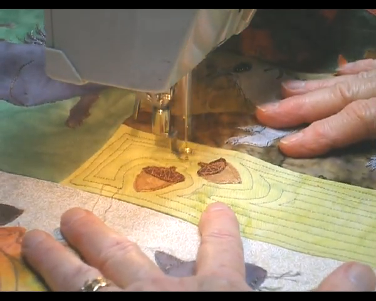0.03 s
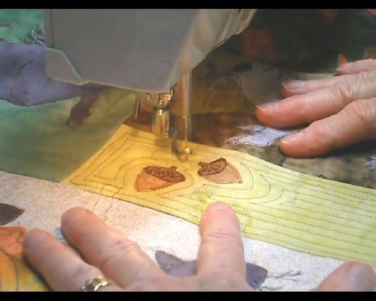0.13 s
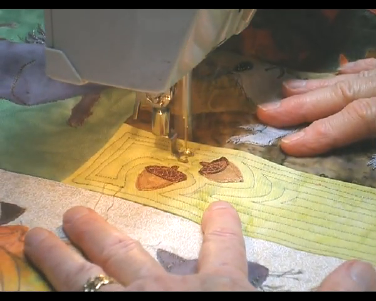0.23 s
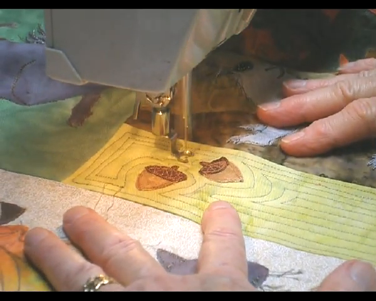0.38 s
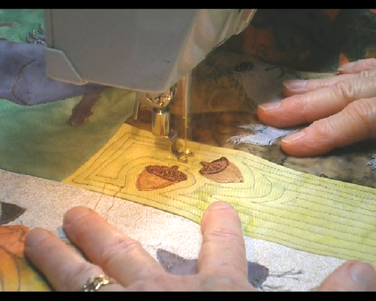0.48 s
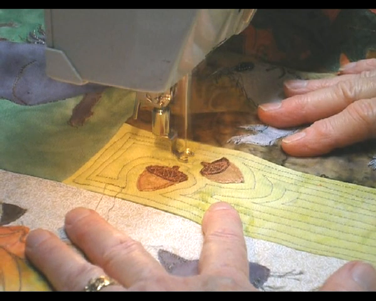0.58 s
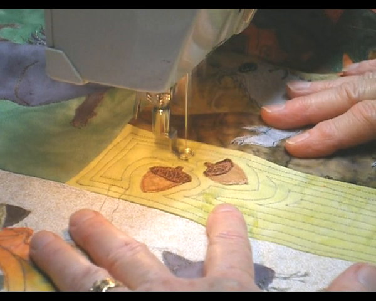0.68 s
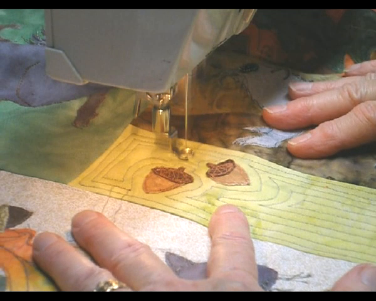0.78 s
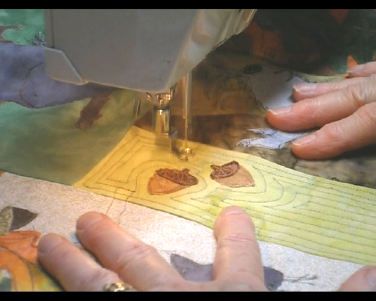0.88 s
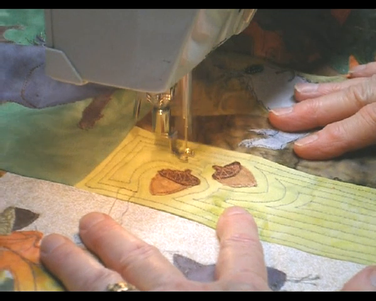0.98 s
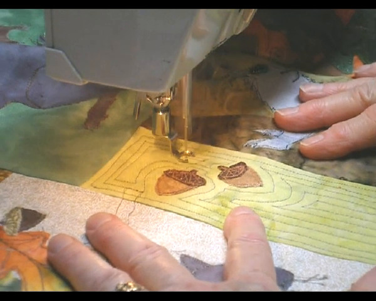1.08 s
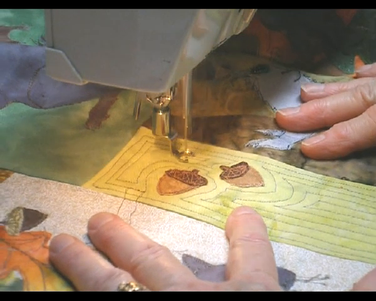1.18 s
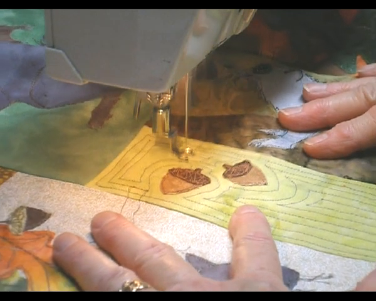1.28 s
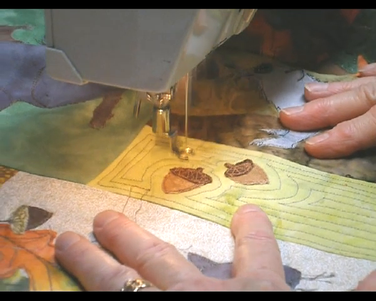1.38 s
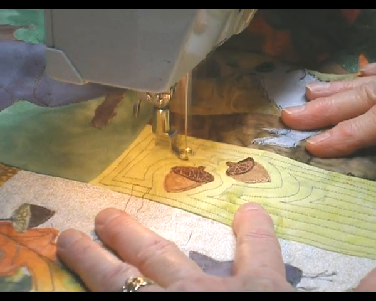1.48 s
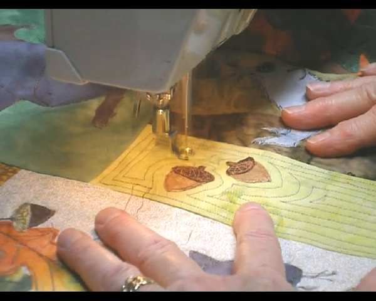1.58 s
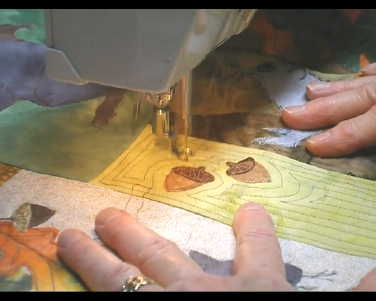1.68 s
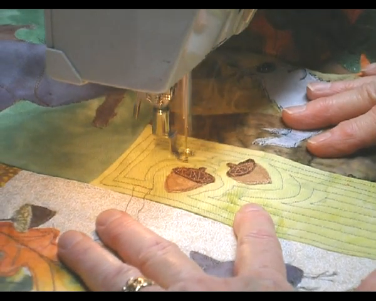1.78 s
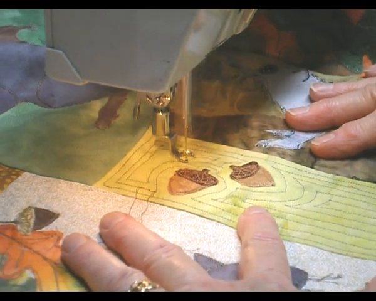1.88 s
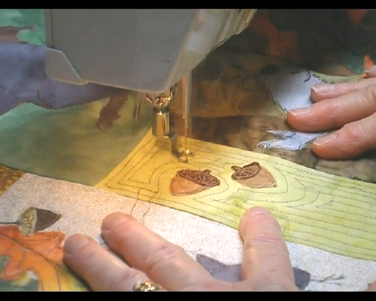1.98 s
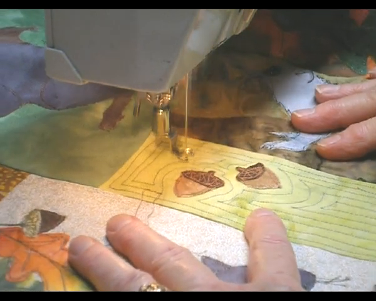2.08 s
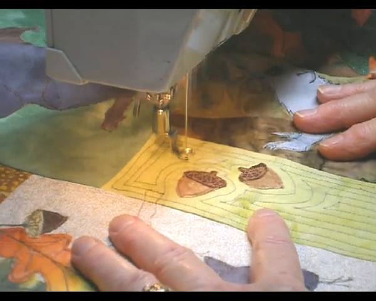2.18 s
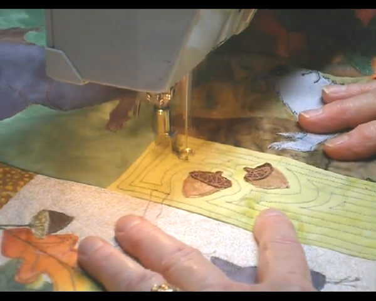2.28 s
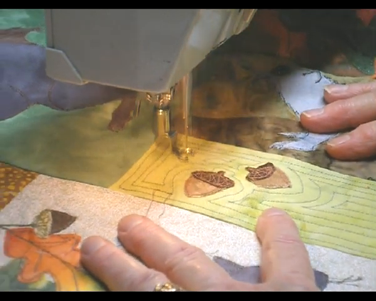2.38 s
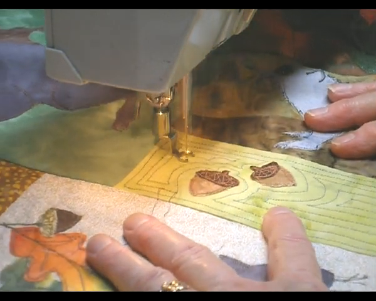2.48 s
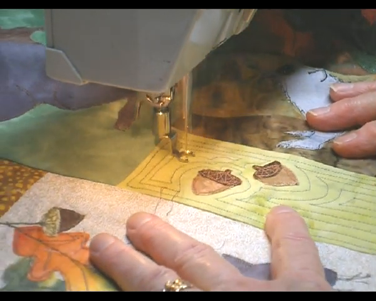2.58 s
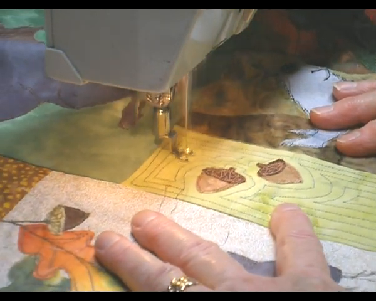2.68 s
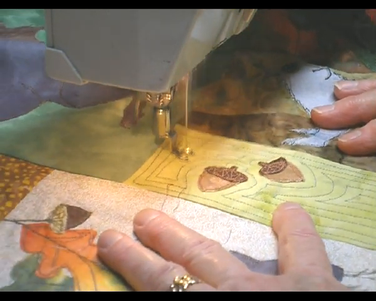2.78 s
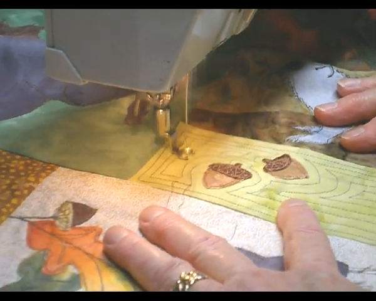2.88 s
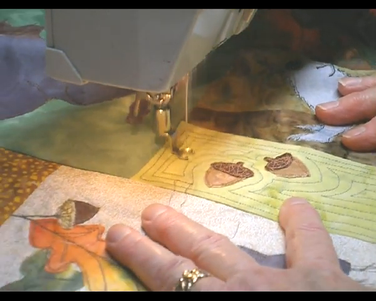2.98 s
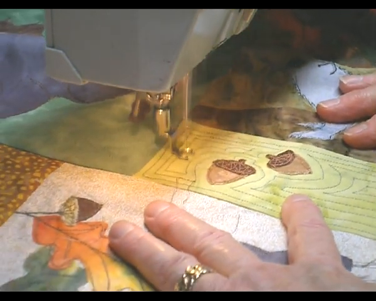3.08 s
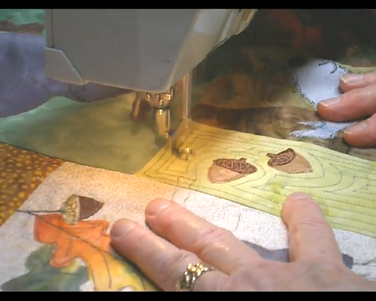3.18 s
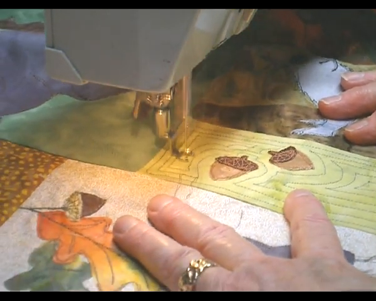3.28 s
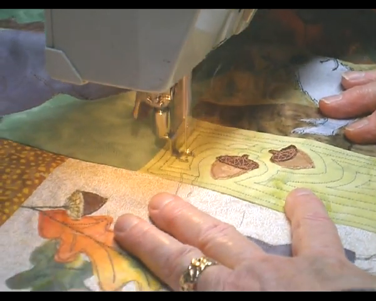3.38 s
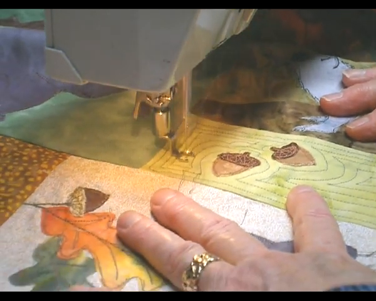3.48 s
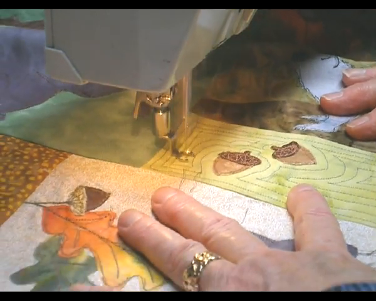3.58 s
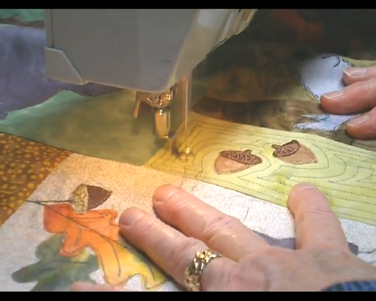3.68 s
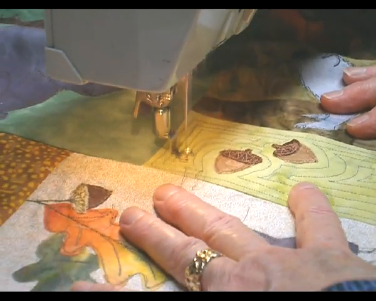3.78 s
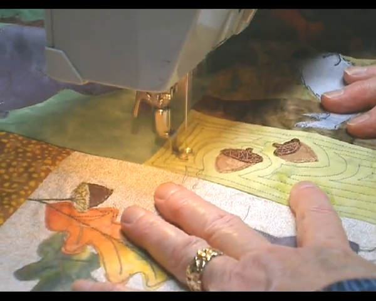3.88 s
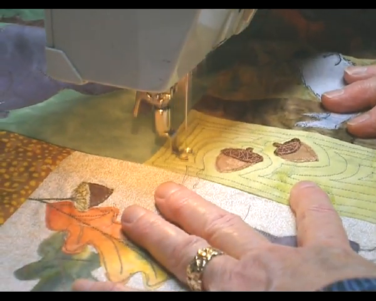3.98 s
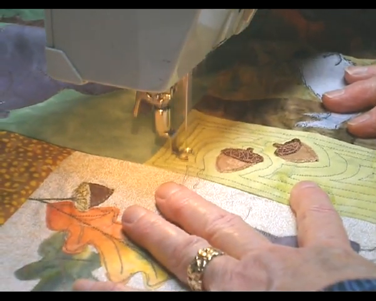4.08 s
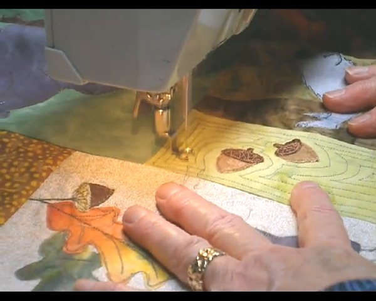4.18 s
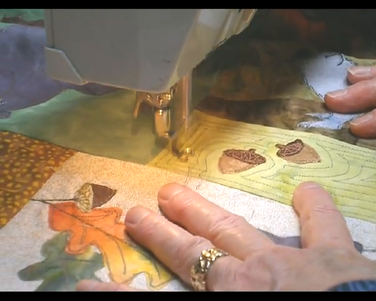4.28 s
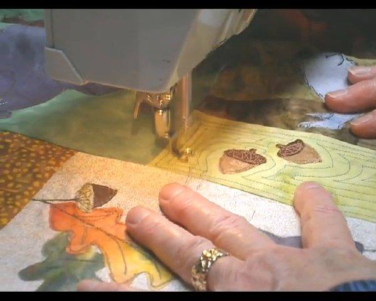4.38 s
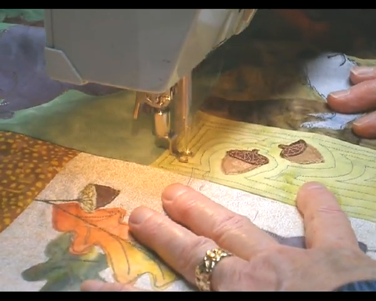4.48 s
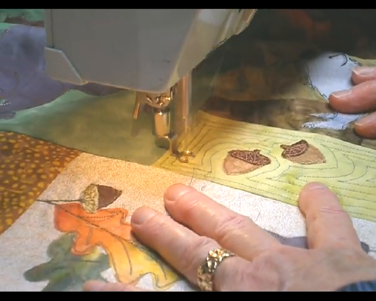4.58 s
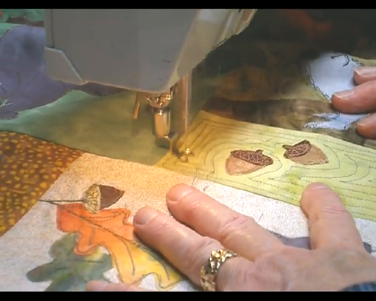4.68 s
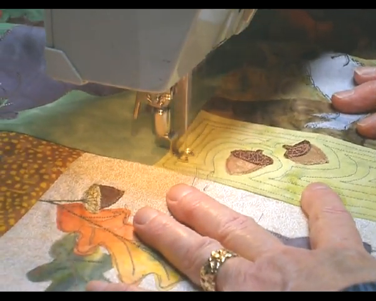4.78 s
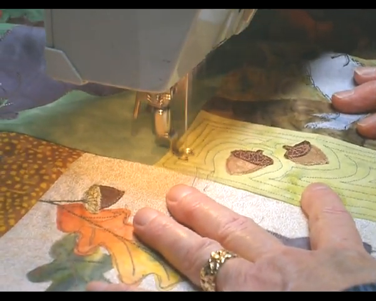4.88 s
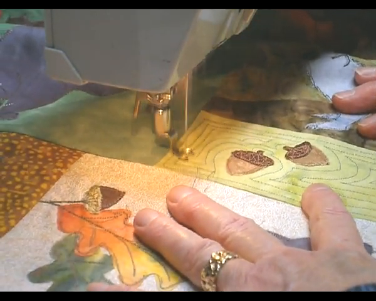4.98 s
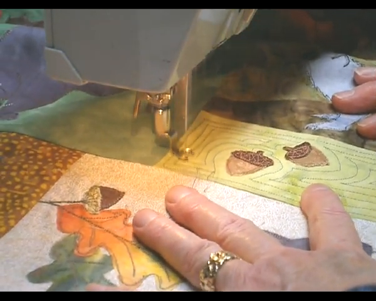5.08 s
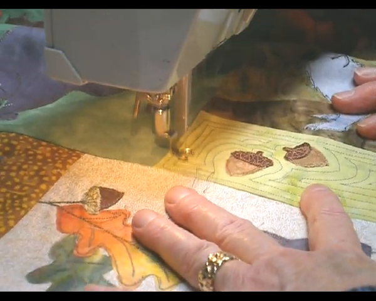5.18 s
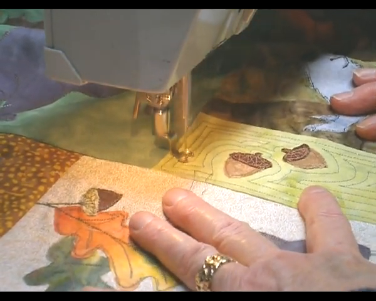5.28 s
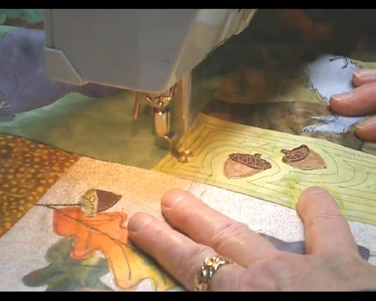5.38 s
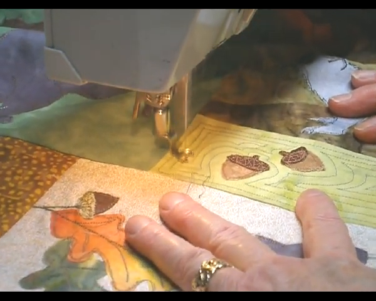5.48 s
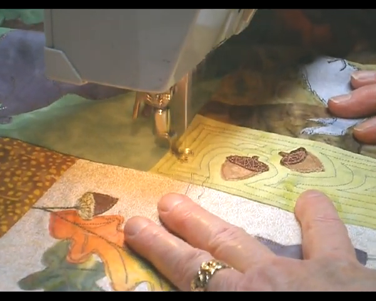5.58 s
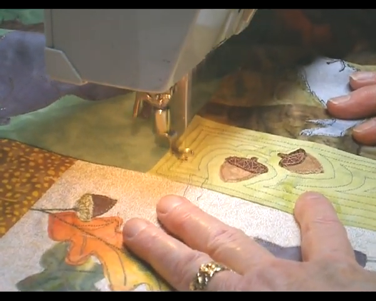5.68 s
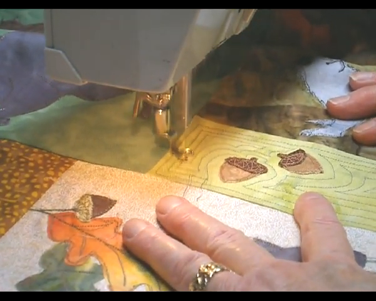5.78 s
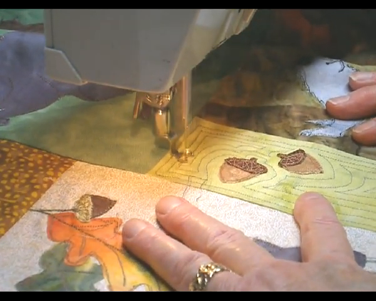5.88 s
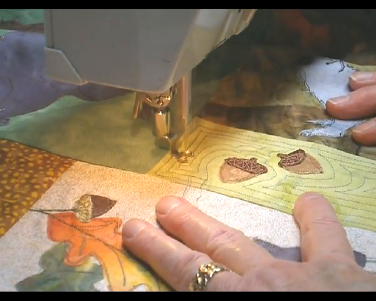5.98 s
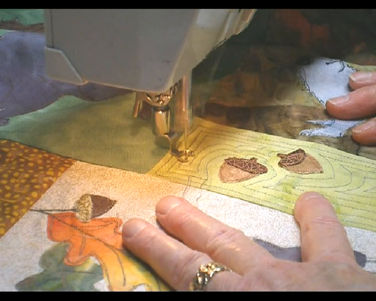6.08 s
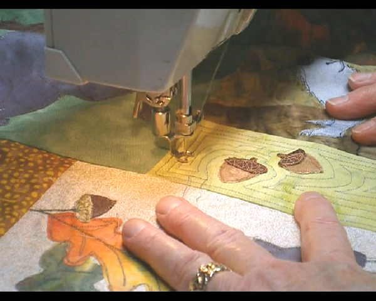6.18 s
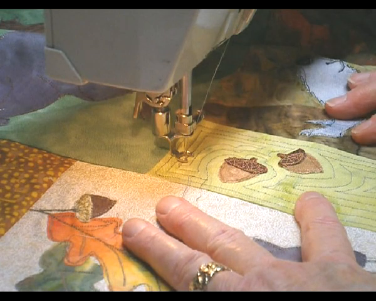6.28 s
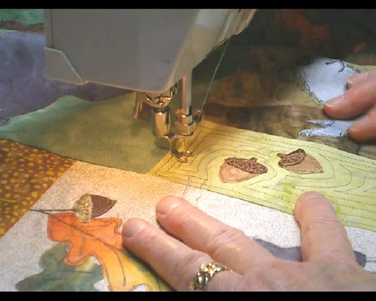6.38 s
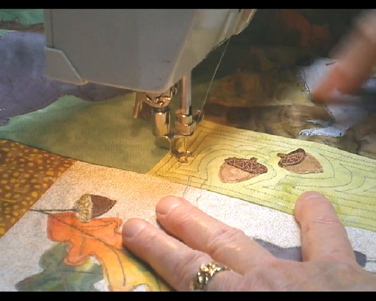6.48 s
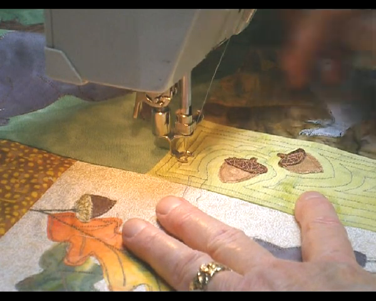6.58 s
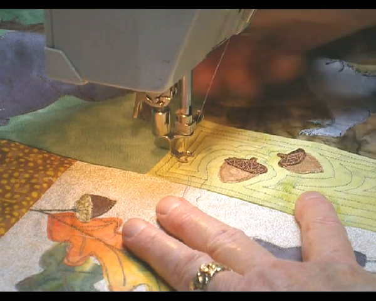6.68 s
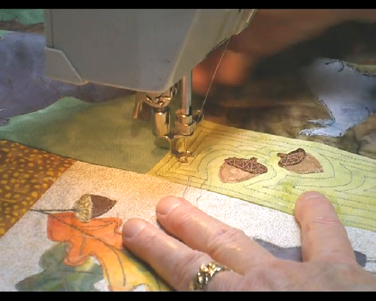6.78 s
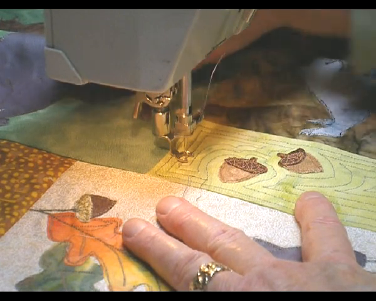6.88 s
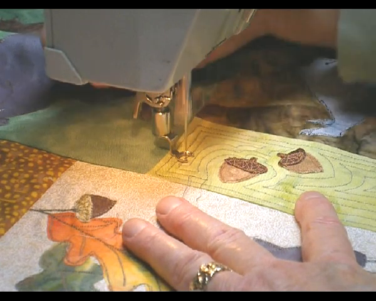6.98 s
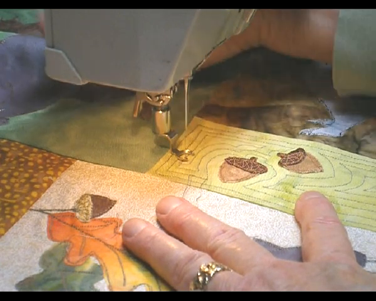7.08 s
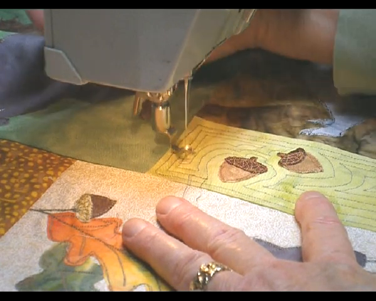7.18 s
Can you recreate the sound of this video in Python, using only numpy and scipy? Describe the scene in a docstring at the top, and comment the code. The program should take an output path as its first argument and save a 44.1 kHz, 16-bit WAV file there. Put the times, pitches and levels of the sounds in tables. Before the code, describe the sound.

A home sewing machine stitches steadily with a rapid clatter and whir, stops suddenly, then a lever knocks and clicks.

```python
"""In a small room, a home sewing machine stitches a quilt at about sixteen stitches a second, coasts to
a stop, and a hand then works a lever on its arm. The excitation is periodic: every turn of the shaft
repeats the same impacts, which ring the modes of bed, arm and steel parts over a whir of gears.
A small microphone samples the sound at a low rate; joining the samples by straight lines mirrors
its spectrum into the treble."""
import sys
import numpy as np
from scipy import signal
from scipy.fft import rfft, irfft, next_fast_len
from scipy.io import wavfile

SR = 44100
rng = np.random.default_rng(int(sys.argv[2]) if len(sys.argv) > 2 else 0)


def unload_audio(sound):
    """Save the sound as a 16-bit wav file, at the path given as the first command line argument."""
    columns = np.transpose(np.atleast_2d(sound))
    # keep every value between -1 and 1, then stretch to whole-number steps
    steps = np.round(np.clip(columns, -1, 1) * 32767)
    wavfile.write(sys.argv[1], SR, steps.astype(np.int16))


N = 319725

# Noise spectra of the room and of the gears and thread: frequency_hz, density_db
ROOM_SPECTRUM = [(24, -44), (40, -37), (172, -15), (283, -15), (328, -16), (367, -10), (449, -16.5),
                 (842, -18), (3300, -25), (4290, -21), (7260, -120)]
WHIR_SPECTRUM = [(60, -15), (115, -1.5), (170, -8.5), (250, 3.5), (450, 2), (700, 2.5), (1100, -7.5),
                 (1500, -6), (2000, -10), (2600, -6.5), (3200, -6.5), (4500, -4.5)]
# The machine running, then coasting to rest: time_s, level_db, brightness_db
RUN_CURVE = [(0, -24.5, 2.5), (.5, -25, 0.5), (.85, -24.5, 1.5), (1.2, -26, 1), (1.5, -25, 2),
             (2.2, -24.5, 0.5), (2.7, -26.5, 2), (3.3, -24.5, 1), (4.4, -25, 2), (5.2, -24, -0.5),
             (5.6, -26, 1.5), (6.24, -25.5, 1), (6.31, -23, -0.5), (6.34, -28, 1), (6.401, -30, -8),
             (6.44, -47.5, 1), (6.5, -38, -30), (6.56, -33, -27)]
# The whir through one turn: phase_turns, dull_db, bright_db
WHIR_CYCLE = [(0, -5.5, 5.5), (.1, 2, -1), (.2, 2.5, 4.5), (.3, -9.5, 2), (.42, -1.5, 2.5),
              (.5, -1.5, -0.5), (.62, 4, 2.5), (0.69, -0.5, 7), (.8, 2, 5), (.88, -4, 3.5), (.93, -9, -1.5)]
# Contacts following each needle knock: phase_turns, bed_db, arm_db, steel_db
TURN_CONTACTS = [(.19, -2, -5, -17), (.33, -11.5, -7.5, -5), (.41, -4, -6.5, -5.5), (0.502, -3.5, -27, -30),
                 (.59, -11, -10.5, -23), (.68, -16.5, -7, -6.5), (.785, -2, -3, -3.5),
                 (0.859, -17, -7, -1.5), (.96, -4.5, -7.5, -35), (0.07, -13, -7, -30)]
# Normal modes of each vibrating part: pitch_hz, level_db, t60_s
BED_MODES = [(256.3, -3.5, 0.06), (280.7, -3, 0.1), (355.6, -2, 0.062), (411, -2.5, 0.11),
             (447.3, -7, 0.13), (480.3, -9.5, 0.22), (544.4, -12, 0.22), (574.7, 2, 0.13),
             (613.4, 1.5, 0.097), (699, 2, 0.061)]
ARM_MODES = [(832, -8, 0.077), (964, -4.5, 0.071), (1022.6, -7, 0.14), (1104.3, 1.5, 0.066),
             (1210, -3, 0.08), (1326, 2.5, 0.028), (1514, -13, 0.056), (1732, -5.5, 0.076)]
STEEL_MODES = [(1857, -3, 0.056), (2106, -14.5, 0.082), (2420, -1.5, 0.019), (2595, -1.5, 0.045),
               (3020, -8, 0.0091), (3060, 5.5, 0.013), (3148, -13.5, 0.17), (3517, 5, 0.035)]
CASING_MODES = [(285.3, -1, 1.5), (366, -1, 1.1), (377, -4, .9), (427, 1, .7), (565, -3, .7), (592, -3, .8),
                (630, -6, .8), (730, 0, .5), (1421, -9, .9)]
NEEDLE_BAR_MODES = [(538, -8, 0.031), (893, 4.5, 0.028), (1204, 5, 0.034), (1498, 14, 0.02),
                    (1903, 6.5, 0.016), (2180, 10.5, 0.0056), (2560, 10, 0.0074), (2937, 15, 0.0084),
                    (3266, 7, 0.0054)]
SQUEAK_MODES = [(2000, -5, .012), (2620, -1, .012)]
LEVER_MODES = [(300, -5, 0.046), (418, 5, 0.057), (530, 5, 0.06), (600, 2, 0.034), (735, -6, 0.037),
               (1140, -4, .03)]
LATCH_MODES = [(1850, -12, .012), (2450, -13, .007), (2950, -2, .005), (3250, 4, .005), (3500, 7, .005)]
# Impacts of the needle bar (one a turn), the stop, the lever and its latch: start_s, level_db
NEEDLE_KNOCKS = [(0.0331, -11.5), (0.0953, -12.5), (0.1575, -10.7), (0.2205, -11.4), (0.2829, -11.5),
                 (0.3453, -10.9), (0.4066, -14.1), (0.4682, -13.1), (0.5297, -13.5), (0.5919, -12.0),
                 (0.6542, -13.2), (0.7165, -11.7), (0.7789, -11.5), (0.8411, -10.9), (0.9034, -12.0),
                 (0.9647, -15.8), (1.0255, -15.4), (1.0855, -14.1), (1.1457, -15.7), (1.2056, -16.9),
                 (1.266, -15.8), (1.3259, -14.8), (1.3862, -12.4), (1.4461, -12.6), (1.5067, -10.5),
                 (1.5665, -12.7), (1.6271, -14.2), (1.6889, -9.8), (1.7511, -11.2), (1.8136, -11.1),
                 (1.876, -12.4), (1.9384, -11.8), (2.0006, -13.9), (2.0629, -14.4), (2.1253, -12.5),
                 (2.187, -11.6), (2.2479, -12.7), (2.3079, -13.0), (2.3678, -15.2), (2.4279, -13.8),
                 (2.4881, -13.8), (2.5481, -14.4), (2.6084, -15.2), (2.6687, -14.8), (2.7286, -14.2),
                 (2.789, -14.4), (2.8502, -15.0), (2.9121, -12.1), (2.9739, -13.8), (3.0363, -9.4),
                 (3.0983, -12.0), (3.1602, -13.6), (3.2223, -9.2), (3.2848, -11.2), (3.3471, -11.5),
                 (3.4093, -10.3), (3.4718, -9.8), (3.5343, -10.9), (3.5967, -11.4), (3.659, -9.2),
                 (3.7215, -10.2), (3.7843, -11.5), (3.8476, -11.2), (3.9109, -10.8), (3.9739, -11.1),
                 (4.0365, -9.9), (4.0989, -10.0), (4.1617, -10.0), (4.2249, -16.9), (4.2877, -9.6),
                 (4.3507, -11.2), (4.414, -10.0), (4.4771, -9.5), (4.5406, -11.3), (4.604, -9.0),
                 (4.6668, -9.2), (4.7293, -9.7), (4.7915, -8.7), (4.8536, -12.4), (4.9158, -9.3),
                 (4.9777, -12.8), (5.04, -9.1), (5.1022, -8.3), (5.1646, -7.8), (5.2272, -10.9),
                 (5.2896, -9.6), (5.3515, -12.8), (5.4126, -13.4), (5.4728, -12.0), (5.533, -14.3),
                 (5.5932, -13.4), (5.653, -14.9), (5.7132, -16.9), (5.7733, -14.7), (5.8333, -12.0),
                 (5.8934, -11.7), (5.9536, -14.5), (6.0137, -13.3), (6.0739, -14.2), (6.134, -12.2),
                 (6.1939, -13.8), (6.2543, -13.4), (6.3167, -10.7)]
STOP_JOLT = [(6.315, -37)]
LEVER_KNOCKS = [(6.984, -35), (7.001, -31), (7.036, -26), (7.044, -18), (7.196, -31), (7.239, -26)]
LATCH_CLICKS = [(7.1515, -7)]
# The loudest ticks of the rate conversion: start_s, level_db
CONVERSION_SLIPS = [(0.1302, -28), (0.236, -24), (0.3413, -21), (0.4683, -25), (0.5106, -22), (0.6794, -24),
                    (0.7429, -25), (1.0928, -17), (1.103, -24), (1.3902, -24), (1.5167, -27), (1.5589, -22),
                    (1.6223, -19), (1.7279, -22), (1.7915, -24), (1.8123, -25), (1.8335, -24),
                    (1.8548, -23), (1.8969, -20), (1.9394, -24), (1.9604, -24), (2.0447, -22),
                    (2.1715, -24), (2.2349, -21), (2.6076, -22), (2.7765, -29), (2.7873, -22),
                    (2.8398, -26), (2.9452, -25), (3.1568, -25), (3.2623, -20), (3.2834, -23),
                    (3.4313, -17), (3.4523, -26), (3.5158, -25), (3.5365, -25), (3.8883, -22),
                    (3.9515, -26), (4.0359, -22), (4.0995, -24), (4.1207, -27), (4.1625, -24), (4.224, -10),
                    (4.3107, -21), (4.3319, -23), (4.3525, -17), (4.4795, -22), (4.6488, -22),
                    (4.6698, -25), (4.9234, -24), (5.05, -28), (5.1346, -22), (5.2534, -24), (5.528, -23),
                    (5.5913, -19), (5.6972, -26), (5.9093, -22), (6.0358, -25)]
# Low thumps: start_s, level_db, pitch_hz
LOW_THUMPS = [(2.729, -37, 100), (4.223, -34, 60)]
# Friction of the hand on the lever: time_s, rumble_db, rustle_db, squeak_db
HAND_CURVE = [(6.6, -57, -56, -64), (6.76, -55, -43, -53), (6.8, -58, -60, -74), (6.955, -68, -57, -72),
              (6.99, -40, -32.5, -66), (7.03, -39, -36, -71), (7.05, -28, -32, -40),
              (7.07, -36.5, -44, -45), (7.11, -45, -56, -42), (7.13, -49, -52, -51), (7.19, -39, -39, -43),
              (7.225, -45, -48, -49), (7.245, -37, -34, -48)]

TIME_S = np.arange(N) / SR


def from_db(db):
    """Amplitude ratio of a level in decibels."""
    return 10 ** (np.asarray(db) / 20)


def unit_rms(x, until_s=6.0):
    """Normalisation to rms 1 over the opening stretch."""
    return x / np.sqrt(np.mean(x[:int(until_s * SR)] ** 2) + 1e-20)


def in_time(rows):
    """Linear interpolation of each column at every sample."""
    seconds, *columns = np.transpose(rows)
    return [np.interp(TIME_S, seconds, column) for column in columns]


def coloured(x, spectrum):
    """Spectral shaping, interpolated on log frequency."""
    hz, db = np.transpose(spectrum)
    bins = np.maximum(np.arange(N // 2 + 1) * SR / N, 1)
    return irfft(rfft(x) * from_db(np.interp(np.log(bins), np.log(hz), db)), N)


def ring(x, hz, t60):
    """Damped oscillator: a unit impulse starts a decaying sine of height 1."""
    r, w = from_db(-60 / (t60 * SR)), 2 * np.pi * hz / SR
    return signal.lfilter([0, np.sin(w)], [1, -2 * r * np.cos(w), r * r], x + 1e-18)


def driven(noise, modes):
    """Forced vibration: noise keeps a body's modes ringing."""
    return sum(from_db(db) * ring(noise, hz, t60) * (-1) ** k for k, (hz, db, t60) in enumerate(modes))


def struck(seconds, level_db, modes, spot, rise_s, spread_db=1.0, lag_cycles=0):
    """Modal superposition: the numbered spot a blow hits sets which way each mode swings."""
    inside = (seconds > 0) & (seconds < N / SR - .001)
    position = .382 * np.arange(1, spot.max() + 2)[:, None]   # in body lengths
    polarity = np.sign(np.sin(np.pi * position * np.arange(1, len(modes) + 1)))
    strength = from_db(level_db[:, None] + spread_db * rng.standard_normal((len(seconds), len(modes))))
    out = 0
    for k, (hz, db, t60) in enumerate(modes):
        clicks = np.zeros(N)
        arrival = ((seconds[inside] + lag_cycles / hz) * SR).astype(int)
        np.add.at(clicks, arrival, (polarity[spot, k] * strength[:, k])[inside])
        # a yielding contact lets the ring build up before it dies
        out = out + from_db(db) * (ring(clicks, hz, t60) - ring(clicks, hz, min(rise_s, t60 / 2)))
    return out / np.sqrt(len(modes))


def grit(per_s, size_db):
    """Shot noise: dense impulses of uneven size, rms 1."""
    sizes = from_db(size_db * np.minimum(rng.exponential(1, N), 5)) * rng.choice([-1, 1], N)
    return unit_rms(sizes * (rng.random(N) < per_s / SR))


def clicks_at(events):
    """One impulse of random sign per row of start_s, level_db."""
    seconds, level_db = np.transpose(events)
    clicks = np.full(N, 1e-18)
    clicks[(seconds * SR).astype(int)] = from_db(level_db) * rng.choice([-1, 1], len(seconds))
    return clicks


def room_tone():
    """Stationary noise forms the room's faint background."""
    return from_db(-48.5) * unit_rms(coloured(rng.standard_normal(N), ROOM_SPECTRUM))


def gear_whir(dull_gain, bright_gain):
    """Amplitude modulation: gear and thread noise swells and sinks in two bands."""
    whir = unit_rms(coloured(grit(9000, size_db=2.5), WHIR_SPECTRUM))
    dull = signal.sosfilt(signal.butter(2, 1200, fs=SR, output="sos"), whir)
    return from_db(-1.5) * (dull * dull_gain + (whir - dull) * bright_gain)


def frame_shake(phase, turn_samples, gain, repeat_share=.4):
    """Partly periodic forcing: worn teeth and cams shake the frame alike each turn."""
    fresh = rng.standard_normal(N) * gain
    periodic = rng.standard_normal(turn_samples)[(phase * turn_samples).astype(int)] * gain
    frame = np.sqrt(repeat_share) * periodic + np.sqrt(1 - repeat_share) * fresh
    out = 0
    for modes, db, force in ((BED_MODES, -7, frame), (ARM_MODES, -13, frame),
                             (STEEL_MODES, -17, fresh), (CASING_MODES, -17, fresh)):
        noise_gain = np.std(driven(rng.standard_normal(SR), modes))
        out = out + from_db(db) * driven(force, modes) / noise_gain
    return out


def shaft_contacts(turn_starts, run_db):
    """Impacts recur at set shaft angles; play, widest in the steel parts, scatters their timing."""
    phase, *part_db = np.transpose(TURN_CONTACTS)
    contact_s = turn_starts[:-1, None] + phase * np.diff(turn_starts)[:, None]
    play = rng.standard_normal(contact_s.shape)
    spot = np.tile(np.arange(len(phase)), len(contact_s))
    drive_db = run_db[np.clip(contact_s * SR, 0, N - 1).astype(int)] + 9.9
    parts = ((BED_MODES, .014, .0001), (ARM_MODES, .01, .0001), (STEEL_MODES, .006, .00025))
    out = 0
    for (modes, rise_s, play_s), db in zip(parts, part_db):
        seconds = (contact_s + play_s * play).ravel() - rise_s / 4
        out = out + struck(seconds, (drive_db + db).ravel(), modes, spot, rise_s, spread_db=2.0)
    return out


def reverberation(x, t60_s=.12):
    """Ten parallel echoes feed back as comb filters, summed in the frequency domain."""
    size = next_fast_len(N + SR)
    w = 2 * np.pi * np.arange(size // 2 + 1) / size
    out = 0
    for k, lag in enumerate(np.geomspace(.0123, .0391, 10) * SR):
        loop = from_db(-60 * lag / SR / t60_s) * np.exp(-1j * w * int(lag))
        out = out + loop / (1 - loop) * (-1) ** k
    return irfft(rfft(x, size) * out, size)[:N] / np.sqrt(10)


def conversion_ticks(x, block_s=.021123, buffer_s=1.3442, first_buffer_s=-.2288):
    """Discontinuities tick: block edges in proportion to the wave, with louder slips at listed times."""
    in_block_s = (TIME_S - first_buffer_s) % buffer_s % block_s
    slips = from_db(-16.5) * x * (in_block_s < 1 / SR) + clicks_at(CONVERSION_SLIPS)
    tick = signal.lfilter(*signal.butter(1, [500, 1800], "band", fs=SR), np.arange(400) == 0)
    return signal.fftconvolve(slips, tick / tick.max())[:N]


def needle_bar():
    """Bending waves disperse: the low modes of each knock arrive later."""
    seconds, level_db = np.transpose(NEEDLE_KNOCKS)
    spot = np.zeros(len(seconds), int)
    return struck(seconds - .0032, level_db, NEEDLE_BAR_MODES, spot, rise_s=.012, lag_cycles=1)


def low_thumps():
    """Heavily damped low oscillations are heard as thumps."""
    return sum(ring(clicks_at([(s, db)]), hz, t60=.039) for s, db, hz in LOW_THUMPS)


def stop_jolt():
    """Free vibration: the stop jolts every part, and the lightly damped casing rings longest."""
    seconds, level_db = np.transpose(STOP_JOLT)
    return sum(struck(seconds, level_db + db, modes, np.zeros(1, int), rise_s=.0059)
               for modes, db in ((CASING_MODES, 1), (BED_MODES, 14), (STEEL_MODES, 8), (ARM_MODES, 4)))


def hand_friction():
    """Friction of the hand rumbles in bed and arm, rustles and squeaks."""
    rumble_db, rustle_db, squeak_db = in_time(HAND_CURVE)
    fade_in = np.clip((TIME_S - HAND_CURVE[0][0]) / .055, 0, 1)
    rub = grit(3000, size_db=1.0)
    rumble = from_db(rumble_db) * unit_rms(driven(rub, BED_MODES) + from_db(-10.5) * driven(rub, ARM_MODES))
    rustle = from_db(rustle_db) * unit_rms(coloured(rub, WHIR_SPECTRUM[4:]))
    squeak = from_db(squeak_db) * unit_rms(driven(rub, SQUEAK_MODES))
    return fade_in * (rumble + rustle + squeak)


def lever_and_latch():
    """Impact excitation: the lever knocks with a soft onset, its latch clicks with a hard one."""
    out = 0
    for blows, modes, rise_s in ((LEVER_KNOCKS, LEVER_MODES, .015), (LATCH_CLICKS, LATCH_MODES, .0015)):
        seconds, level_db = np.transpose(blows)
        out = out + struck(seconds, level_db, modes, np.arange(len(seconds)), rise_s)
    return out


def scene():
    """Superposition of machine, hand and room; the shaft angle times the running sounds."""
    knock_s = np.array(NEEDLE_KNOCKS)[:, 0]
    coasting_s = knock_s[-1] + np.cumsum([.074, .085])   # the last turns slow down
    turn_starts = np.r_[2 * knock_s[0] - knock_s[1], knock_s, coasting_s]
    turn_samples = int(np.median(np.diff(turn_starts)) * SR)
    phase = np.interp(TIME_S, turn_starts, np.arange(len(turn_starts))) % 1
    run_db, brightness_db = in_time(RUN_CURVE)
    run_db -= 180 * np.maximum(TIME_S - RUN_CURVE[-1][0], 0)   # fades at 180 dB/s once at rest
    cycle, dull_db, bright_db = np.transpose(WHIR_CYCLE)
    dull_gain = from_db(run_db + np.interp(phase, cycle, dull_db, period=1))
    bright_gain = from_db(run_db + np.interp(phase, cycle, bright_db, period=1) + brightness_db + 7)
    direct = shaft_contacts(turn_starts, run_db) + needle_bar() + stop_jolt()
    direct += gear_whir(dull_gain, bright_gain) + frame_shake(phase, turn_samples, dull_gain)
    direct += hand_friction() + lever_and_latch()
    return (direct + from_db(-7) * reverberation(direct) + room_tone())[None]


def record(dry):
    """A nonlinear capsule is sampled slowly; linear interpolation leaves spectral images in the treble."""
    sample_hz, cutoff_hz = 7875, 15750
    x = signal.sosfilt(signal.butter(2, 200, "high", fs=SR, output="sos"), dry[0])
    x = signal.sosfilt(signal.cheby1(9, .5, 3270, fs=SR, output="sos"), x)   # anti-alias filter
    x = x + .089 * signal.lfilter([1, -1], [1, -.999], x ** 2)   # difference tones fill the bass
    x = .69 * np.tanh(x / .68)
    amplifier_rumble = from_db(-69) * unit_rms(signal.lfilter([1], [1, -.97], rng.standard_normal(N)))
    slow = signal.resample_poly(x + amplifier_rumble + low_thumps(), sample_hz, SR)
    x = np.interp(TIME_S, np.arange(len(slow)) / sample_hz, slow)
    x = x + conversion_ticks(x) - .0014   # with a small DC offset
    x = signal.sosfilt(signal.butter(1, 17000, fs=SR, output="sos"), x)
    return signal.sosfilt(signal.ellip(12, .5, 80, cutoff_hz, fs=SR, output="sos"), x)[None]


dry = scene()
out = record(dry)
unload_audio(out)
```